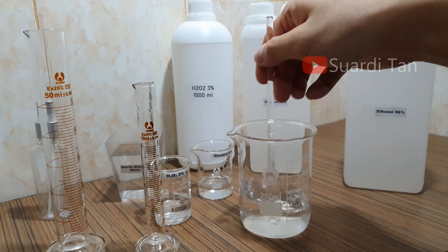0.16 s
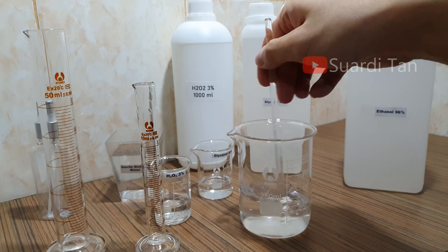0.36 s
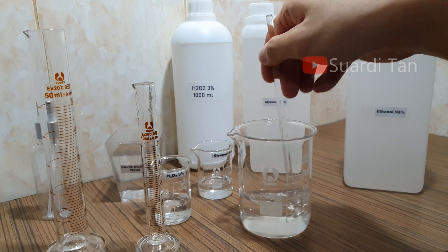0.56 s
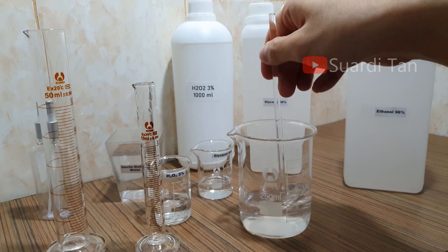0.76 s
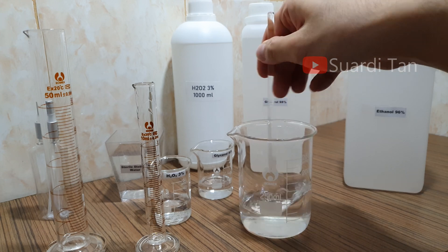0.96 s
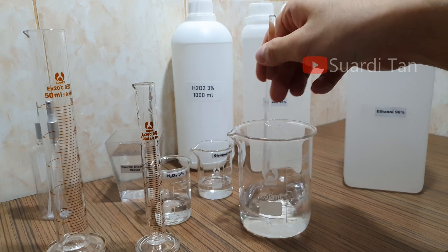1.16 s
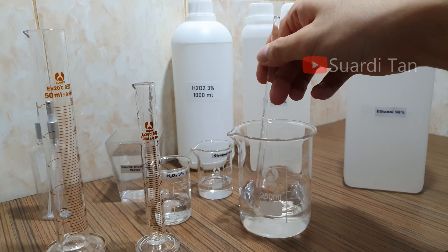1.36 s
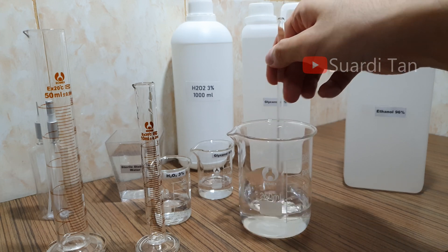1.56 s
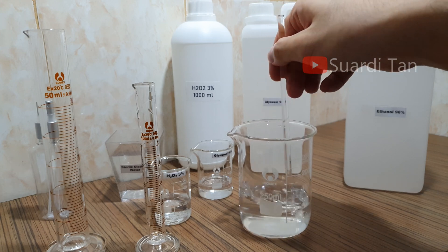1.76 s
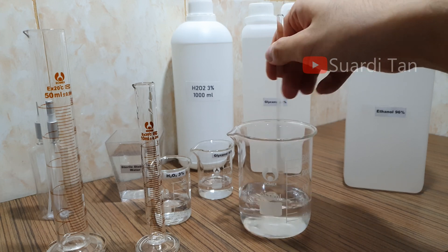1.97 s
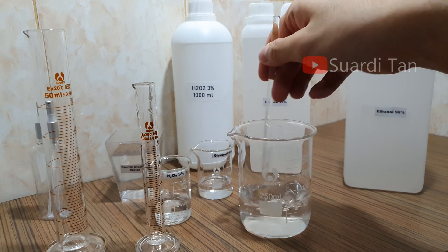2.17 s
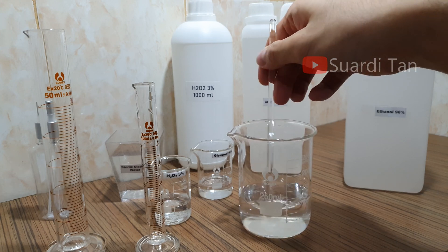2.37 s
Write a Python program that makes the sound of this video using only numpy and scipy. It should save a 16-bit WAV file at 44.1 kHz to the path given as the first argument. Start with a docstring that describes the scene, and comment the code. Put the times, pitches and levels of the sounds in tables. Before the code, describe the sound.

Stirring liquid in a glass beaker, quick bright clinks and duller knocks with faint watery plinks

```python
"""Stirring in a glass beaker

A glass rod stirs liquid in a glass beaker on a wooden table in a small hard-walled room.
Each knock excites decaying modes of table, beaker and rod, damped by the liquid and the fingers,
together with a short crack of filtered noise. The liquid plinks as gently rising, dying sines;
the walls answer with a short tail of decaying noise, and the room hums as shaped noise and two tones.
"""
import sys
import numpy as np
from scipy import signal
from scipy.io import wavfile

SR = 44100
rng = np.random.default_rng(int(sys.argv[2]) if len(sys.argv) > 2 else 0)


def waveform_to_disk(signal):
    """Save audio, clipped to [-1, 1], as 16-bit WAV at the path in sys.argv[1]."""
    frames = np.transpose(np.atleast_2d(signal))
    scaled = np.clip(frames, -1, 1) * 32767
    samples = np.round(scaled).astype(np.int16)
    wavfile.write(sys.argv[1], SR, samples)


def boost_factor(decibels):
    """Convert a level in decibels to a linear amplitude factor."""
    exponent = np.asarray(decibels, float) / 20
    return 10 ** exponent


N = 105840
LEAD_S = 0.1   # computed ahead of the audible start
LONG = N + int(LEAD_S * SR)
SIDES = np.array([[1], [-1]])   # sign of a left-right difference

# Knocks and light touches of the rod: start_s [s], crack_db [dB, before CRACK_OFFSET_DB],
# ring level of each part [dB]: table_db, body_db, wall_db, rod_low_db, rod_middle_db, rod_high_db,
# pitch favoured by the place of contact [Hz]: body_hz, wall_hz, rod_high_hz
KNOCKS = [(0.117, -8, -51, -36.5, -31.5, -23, -22.5, -19, 1500, 3730, 12200),
          (0.2725, -20, -36.5, -30, -36, -31, -46.5, -41.5, 910, 2670, 14900),
          (0.334, -33, -67.5, -45.5, -51.5, -73.5, -80, -78, 1160, 2700, 14000),
          (0.438, -14.5, -54, -49.5, -41, -37.5, -37, -31, 1200, 3940, 15000),
          (0.458, -13.5, -40.5, -29.5, -38.5, -30.5, -46, -45, 1060, 3000, 12500),
          (0.526, -30, -83, -77, -46.5, -62, -75, -70, 960, 3250, 14900),
          (0.668, -4.5, -53.5, -48, -39.5, -30.5, -30, -19.5, 1500, 3770, 16270),
          (0.688, -19, -74.5, -49, -42, -34.5, -34.5, -28, 1440, 3430, 15500),
          (0.8775, -6, -34.5, -28, -45.5, -40.5, -45.5, -39, 1157, 2380, 15000),
          (1.001, -4, -56, -48, -36.5, -27.5, -25, -20, 1350, 3200, 12500),
          (1.012, -1.5, -51, -43.5, -43, -31.5, -25, -19, 1390, 4660, 15600),
          (1.096, -31, -53.5, -43.5, -45, -84, -43, -47, 1740, 2900, 13100),
          (1.17, -16.5, -37, -30.5, -33, -36, -48.5, -42.5, 972, 2490, 14700),
          (1.317, -21.5, -40.5, -28.5, -39.5, -37.5, -46, -41, 1250, 2750, 12200),
          (1.377, -8.5, -39.5, -27.5, -32.5, -22.5, -27, -24.5, 1350, 3000, 12800),
          (1.6565, -29.5, -43.5, -39.5, -50, -53, -65, -66.5, 1290, 2650, 13700),
          (1.761, -53, -55, -66, -70, -62.5, -75, -63, 1800, 4350, 13950),
          (1.824, -41.5, -55, -41, -49.5, -53.5, -61, -65, 1040, 4160, 14700),
          (1.919, -13, -39.5, -25.5, -34.5, -33, -43, -40, 1100, 3700, 13400),
          (2.121, -12.5, -35, -31.5, -35.5, -41, -46.5, -39.5, 1000, 2390, 14000),
          (2.157, -23.5, -58, -42, -46, -39, -45.5, -49.5, 1230, 2500, 12030),
          (2.39, -30.5, -44.5, -37.5, -43.5, -39, -52.5, -54, 1470, 2440, 12600)]
# A knock just before the start, still ringing: the columns of KNOCKS after start_s [dB, Hz]
EARLIER_KNOCK = (-58.5, -63, -41, -47, -47, -70.5, -69, 987.5, 2606.5, 13010)
EARLIER_S = -0.02
# Modes of the wooden table: pitch_hz [Hz], level_db [dB within the part], t60_s [s]
TABLE_MODES = [(424.6, 8, 0.064), (500.7, 5.5, 0.12), (644.6, -7, 0.091), (338, 1, 0.028)]
# Modes of the beaker body: pitch_hz [Hz], level_db [dB within the part], t60_s [s]
BODY_MODES = [(989.6, -4, 0.13), (1077, 1.5, 0.046), (1204.5, 1.5, 0.053), (1290, 5, 0.046),
              (1360, -5.5, 0.26), (1500, 10, 0.026), (1790, 6, 0.0736), (1901, 12, 0.024)]
# Modes of the beaker wall: pitch_hz [Hz], level_db [dB within the part], t60_s [s]
WALL_MODES = [(2074, 2.5, 0.083), (2467, 3, 0.11), (2668, 14.5, 0.018), (3000, -7, 0.025),
              (3250, 2.5, 0.033), (3630, -15.5, 0.45), (3734, -0.5, 0.2), (3947, 15, 0.015),
              (4433, 15, 0.039), (4945, 13, 0.035)]
# Low modes of the rod: pitch_hz [Hz], level_db [dB within the part], t60_s [s]
ROD_LOW_MODES = [(5708, -2, 0.047), (6385, 0.5, 0.079), (6530, 5.5, 0.017), (6580, 6.5, 0.035),
                 (7030, -1.5, 0.022), (7890, -11, 0.14)]
# Middle modes of the rod: pitch_hz [Hz], level_db [dB within the part], t60_s [s]
ROD_MIDDLE_MODES = [(9374, 0.5, 0.048), (9544, -6.5, 0.061), (9900, -16.5, 0.048), (10360, -5.5, 0.061),
                    (11070, -0.5, 0.024)]
# High modes of the rod: pitch_hz [Hz], level_db [dB within the part], t60_s [s]
ROD_HIGH_MODES = [(12200, 4, 0.044), (12320, 1.5, 0.034), (12840, -8, 0.018), (13300, 4, 0.05),
                  (13570, -20.5, 0.024), (14300, 2.5, .035), (15300, -12, 0.016), (15500, 16, 0.027)]
# Loss away from the favoured pitch [dB per octave]: body, wall, rod_high
FAVOUR_LOSS = (26, 16.5, 30.5)
# Single plinks of the liquid and light ticks: start_s [s], pitch_hz [Hz], level_db [dB], t60_s [s]
PLINKS = [(0.087, 1784, -36.5, 0.03), (0.181, 1000, -33, 0.065), (0.245, 1238, -41.5, 0.17),
          (1.097, 1790, -41, 0.028), (1.34, 694, -33.5, 0.058), (1.81, 990, -45, 0.062),
          (1.86, 3237, -33.5, 0.028)]
# Reverberation of the room: pitch_hz [Hz], t60_s [s], level_db [dB]
ROOM = [(302, 0.23, -1), (1000, 0.44, -11.5), (2920, 0.39, -9.5), (7000, 0.49, -13.5), (14000, 0.34, -14)]
# Spectrum of the background noise: pitch_hz [Hz], density_db [relative dB per Hz]
HUM = [(30, -1), (48, -1), (145, -5), (200, -15), (430, -11), (800, -24.5), (1350, -20), (3000, -31.5),
       (6500, -45), (14900, -39), (16500, -54.5)]
# Steady background tones: pitch_hz [Hz], level_db [dB rms]
HUM_TONES = [(47, -64.5), (147, -66.5)]
# Likeness of the two microphones: pitch_hz [Hz], likeness [0 to 1]
LIKENESS = [(30, 1), (150, 0.77), (500, 0.83), (1500, 0.12), (16000, 0)]

MODE_SCATTER_DB, PITCH_SCATTER = 1.8, 0.003   # deviation from knock to knock: dB, share of pitch
# Moving liquid makes each mode waver: depth, and rate as a share of its pitch (over a base of 30 per s)
WAVER, WAVER_SHARE = 0.9, 0.015
STEADY_T60_S = 0.087   # modes with a longer t60 waver less
TABLE_UNREST = 0.4   # the table, out of the liquid, wavers, varies and cracks only by this share
# The ring builds up while rod and glass touch: a fixed time plus cycles, so low modes come later
CONTACT_S, BUILD_CYCLES = 0.00042, 1.85
CRACK_OFFSET_DB = -12   # added to every crack_db
CRACK_BASE_T60_S, CRACK_CYCLES = 0.0074, 22   # t60 is the base plus cycles of the part's mean pitch
CRACK_WIDTH = 1.388   # the crack spans this factor either side of the favoured pitch
CLICK_DB = 18.5   # the body's first tock over the noise of the contact
TREBLE_LEFT_OVER_RIGHT_DB = -1.5   # the rod's high modes lean to the right
PLINK_RISE = 0.0089   # share of pitch gained over one t60
SLOSHES_PER_S, SLOSH_DB = 37, -66   # faint plinks: density, and level near the weakest
ROOM_DELAY_S = 0.00047
HUM_DB = -56   # noise alone, rms


def at_hz(points, hz, axis=1):
    """Interpolates a table column linearly in log frequency."""
    points = np.array(points)
    return np.interp(np.log(hz), np.log(points[:, 0]), points[:, axis])


def add(out, sound, s):
    """Superposes a stereo sound on the track from time s."""
    i = int((s + LEAD_S) * SR)
    out[:, i:i + sound.shape[1]] += sound[:, :LONG - i]


def dying(t, t60, hz):
    """Exponential decay: a soft onset, then a fall of 60 dB in t60."""
    onset = 1 - np.exp(-t / (CONTACT_S + BUILD_CYCLES / hz))
    return onset * boost_factor(-60 * t / t60)


def apart(hz, draw):
    """Spatial coherence: phases at the two microphones differ more as the pitch rises."""
    spread = np.pi * (1 - at_hz(LIKENESS, hz)) / 2
    return spread * draw * SIDES


def bands(length):
    """Band decomposition: half-octaves of partly coherent stereo noise, with their centres."""
    white = rng.standard_normal((2, 2, length))
    lows = 35 * 2 ** np.arange(0, 9, 0.5)
    highs = np.append(lows[1:], 19000)
    for k, (low, high) in enumerate(zip(lows, highs)):
        sos = signal.butter(2, [low, high], "band", fs=SR, output="sos")
        mid, side = signal.sosfilt(sos, white[k % 2])   # neighbouring bands are independent
        hz = np.sqrt(low * high)
        alike = np.clip(at_hz(LIKENESS, hz), 0, 1)
        yield hz, np.sqrt(1 + alike) * mid + np.sqrt(1 - alike) * side * SIDES


def hum():
    """Stationary noise: the steady background of room and microphones, with two low tones."""
    noise = sum(boost_factor(at_hz(HUM, hz)) * band for hz, band in bands(LONG))
    t = np.arange(LONG) / SR
    tones = sum(boost_factor(db) * np.sqrt(2) * np.sin(2 * np.pi * hz * t) for hz, db in HUM_TONES)
    return boost_factor(HUM_DB) * noise / noise.std() + tones


def waver(t, hz, t60, unrest):
    """Random modulation: height and phase wobble, faster for higher modes, giving a rough ring."""
    knots = np.arange(300) / (30 + WAVER_SHARE * hz)
    z = np.array([np.interp(t, knots, row) for row in rng.standard_normal((4, 300))])
    mid, side = z[:2] + 1j * z[2:]
    alike = np.clip(at_hz(LIKENESS, hz), 0, 1)   # high modes wobble less alike in stereo
    both = np.sqrt((1 + alike) / 2) * mid + np.sqrt((1 - alike) / 2) * side * SIDES
    depth = unrest * WAVER * min(1, STEADY_T60_S / t60)
    return 1 + depth * np.minimum(t / 0.012, 1) * both   # the wobble sets in over 12 ms


def modal_ring(t, modes, favoured_hz, loss, unrest):
    """Modal superposition: one part's modes, weighted by the place of contact, at unit early rms."""
    sound = 0
    for hz, db, t60 in modes:
        pitch_draw, phase_draw, level_draw, side_draw = rng.standard_normal(4)
        phase = 2 * np.pi * hz * (1 + PITCH_SCATTER * pitch_draw) * t + apart(hz, np.tanh(phase_draw))
        place_db = -loss * abs(np.log2(hz / favoured_hz)) if favoured_hz else 0
        scatter_db = unrest * MODE_SCATTER_DB * (level_draw + side_draw / 2 * SIDES)
        wave = (waver(t, hz, t60, unrest) * np.exp(1j * phase)).imag
        sound = sound + boost_factor(db + place_db + scatter_db) * wave * dying(t, t60, hz)
    return sound / np.sqrt(np.mean(sound[:, :SR // 100] ** 2))


def contact_crack(t, modes, favoured_hz):
    """Broadband excitation: a dying noise burst filtered to the part's range, at unit early level."""
    hz = np.array(modes)[:, 0]
    edges = [hz.min() * 0.96, hz.max() * 0.91]
    if favoured_hz:
        edges = np.clip([favoured_hz / CRACK_WIDTH, favoured_hz * CRACK_WIDTH], *edges)
    t60 = CRACK_BASE_T60_S + CRACK_CYCLES / hz.mean()
    touch = rng.standard_normal((2, len(t))) * boost_factor(-60 * t / t60)
    if modes is BODY_MODES:
        touch[:, 0] += boost_factor(CLICK_DB)
    noise = signal.sosfilt(signal.butter(3, edges, "band", fs=SR, output="sos"), touch)
    return noise / noise[:, :SR // 100].std()


def knocks():
    """Impact excitation: every knock rings all parts with new strengths and cracks at contact."""
    out, t = np.zeros((2, LONG)), np.arange(SR // 4) / SR
    for s, crack_db, *levels_db, body_hz, wall_hz, top_hz in [(EARLIER_S, *EARLIER_KNOCK)] + list(KNOCKS):
        parts = [(TABLE_MODES, None, 0),
                 (BODY_MODES, body_hz, FAVOUR_LOSS[0]),
                 (WALL_MODES, wall_hz, FAVOUR_LOSS[1]),
                 (ROD_LOW_MODES, None, 0),
                 (ROD_MIDDLE_MODES, None, 0),
                 (ROD_HIGH_MODES, top_hz, FAVOUR_LOSS[2])]
        ring, crack = 0, 0
        for (modes, favoured_hz, loss), part_db in zip(parts, levels_db):
            unrest = TABLE_UNREST if modes is TABLE_MODES else 1
            pan_db = TREBLE_LEFT_OVER_RIGHT_DB / 2 * SIDES if modes is ROD_HIGH_MODES else 0 * SIDES
            gain = boost_factor(part_db + pan_db)
            ring = ring + gain * modal_ring(t, modes, favoured_hz, loss, unrest)
            crack = crack + unrest * gain * contact_crack(t, modes, favoured_hz)
        crack_rms = np.sqrt(np.mean(crack[:, :SR // 300] ** 2))
        add(out, ring + crack * boost_factor(crack_db + CRACK_OFFSET_DB) / crack_rms, s)
    return out


def liquid():
    """Damped oscillation: listed plinks and faint random ones, each rising slightly as it dies."""
    out, t = np.zeros((2, LONG)), np.arange(SR // 6) / SR
    faint = []
    for when, height, strength in rng.random((int(SLOSHES_PER_S * LONG / SR), 3)):
        start_s = when * LONG / SR - LEAD_S
        level_db = SLOSH_DB - 4.8 * np.log(strength + 0.011)   # few are strong
        t60 = 20 / (400 * 8.7 ** height)   # high plinks die sooner
        faint.append((start_s, 400 * 5 ** height, level_db, t60))
    for s, hz, db, t60 in PLINKS + faint:
        bent_t = t + PLINK_RISE * t * t / (2 * t60)
        phase = 2 * np.pi * hz * bent_t + apart(hz, rng.uniform(0.026, 1))
        add(out, boost_factor(db) * np.sin(phase) * dying(t, t60, hz), s)
    return out


def room(x):
    """Reverberation by convolution: dense reflections that die band by band."""
    t = np.arange(SR // 2) / SR
    tail = 0
    for hz, noise in bands(len(t)):
        t60 = at_hz(ROOM, hz)
        envelope = boost_factor(at_hz(ROOM, hz, axis=2) - 60 * t / t60)
        tail = tail + noise * envelope / np.sqrt(t60 * SR / np.log(1e6))   # energy independent of t60
    tail = tail * np.clip(t / ROOM_DELAY_S - 1, 0, 1)   # silent up to the delay, then fades in
    return signal.fftconvolve(x, tail, axes=1)[:, :LONG]


def scene():
    """Superposition of direct sound, reverberation and background, without the lead."""
    near = knocks() + liquid()
    return (near + room(near) + hum())[:, -N:]


def roll_off(x):
    """The treble ends steeply here."""
    return signal.sosfilt(signal.butter(12, 16990, fs=SR, output="sos"), x)


def record(dry):
    """Low-pass filtering: the top is cut, by 50 dB from 16.8 kHz up."""
    low_pass = signal.cheby2(10, 50, 16800, fs=SR, output="sos")
    mix = signal.sosfilt(low_pass, dry)
    return roll_off(mix)


dry = scene()
out = record(dry)
waveform_to_disk(out)
```